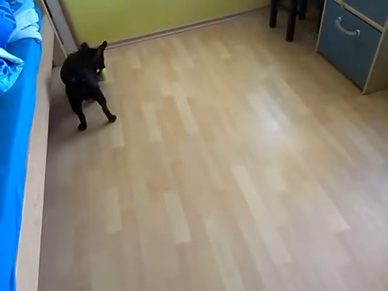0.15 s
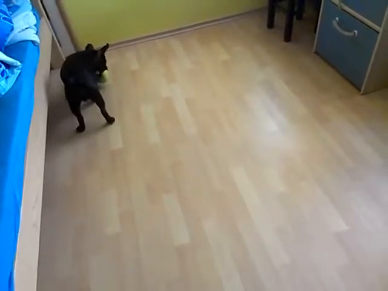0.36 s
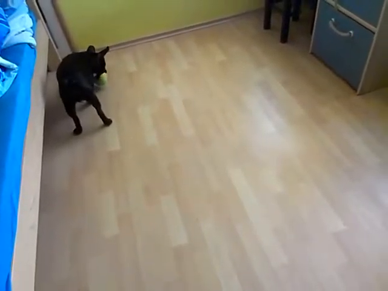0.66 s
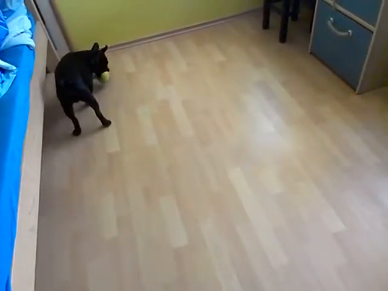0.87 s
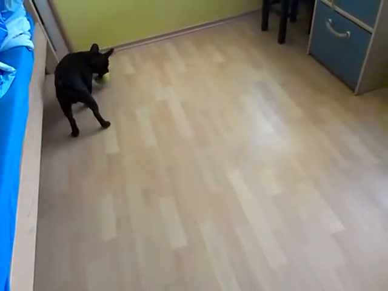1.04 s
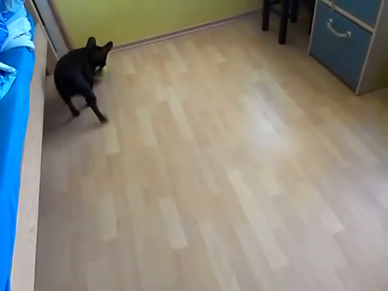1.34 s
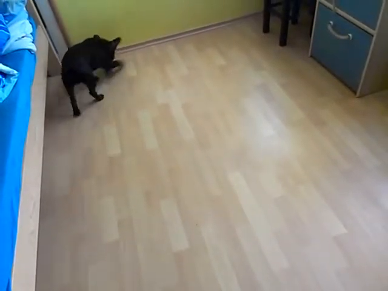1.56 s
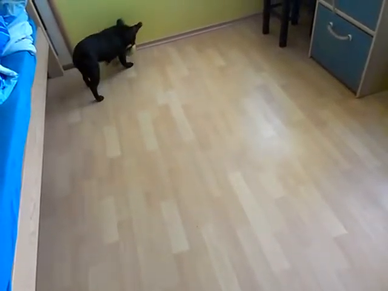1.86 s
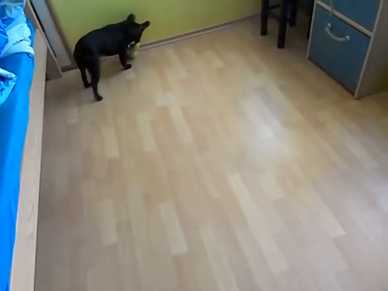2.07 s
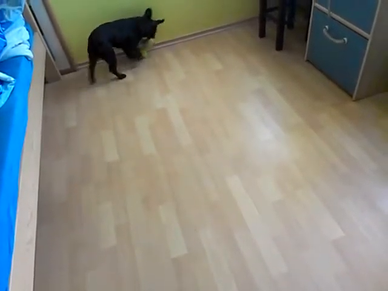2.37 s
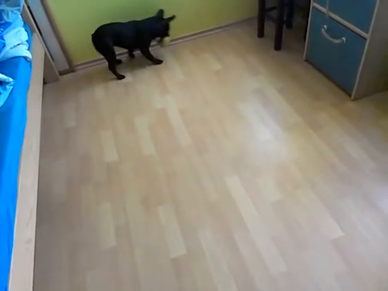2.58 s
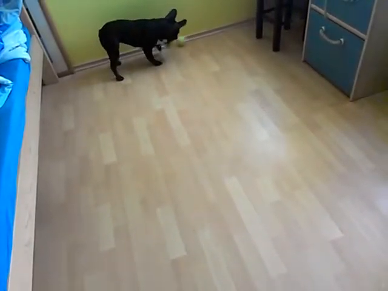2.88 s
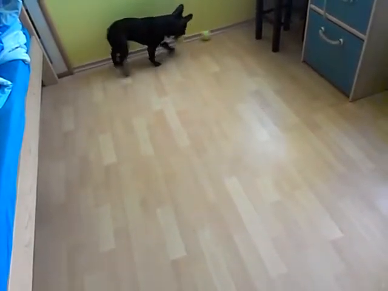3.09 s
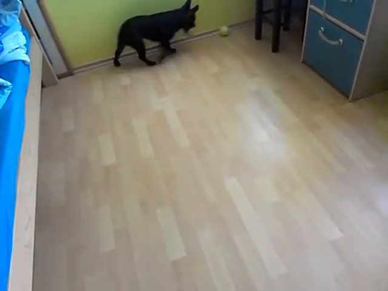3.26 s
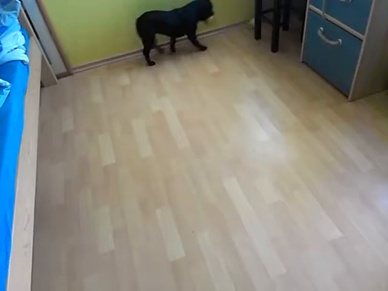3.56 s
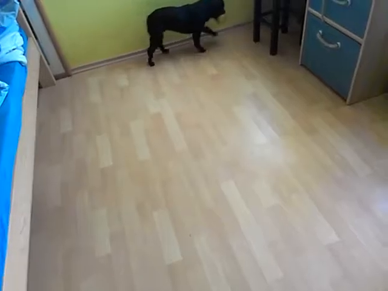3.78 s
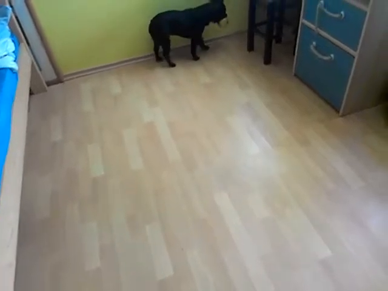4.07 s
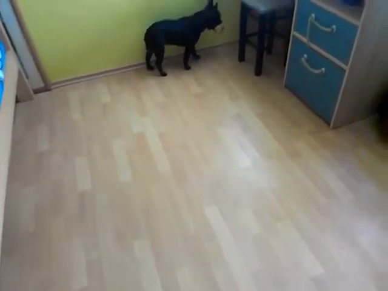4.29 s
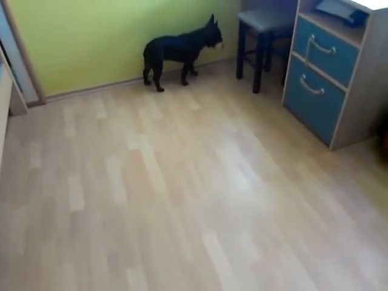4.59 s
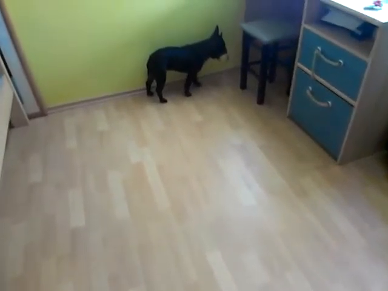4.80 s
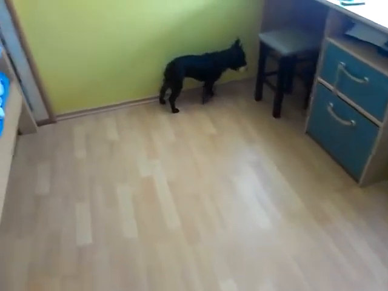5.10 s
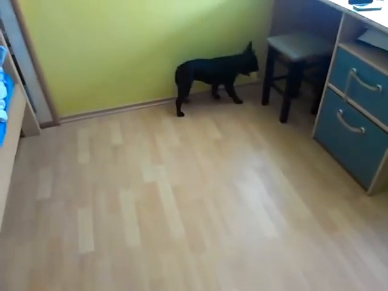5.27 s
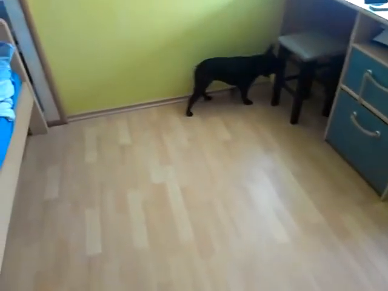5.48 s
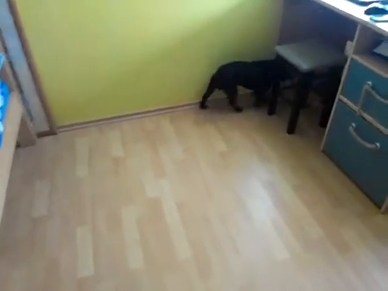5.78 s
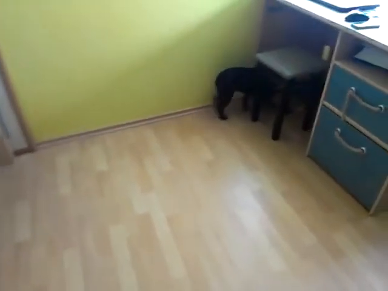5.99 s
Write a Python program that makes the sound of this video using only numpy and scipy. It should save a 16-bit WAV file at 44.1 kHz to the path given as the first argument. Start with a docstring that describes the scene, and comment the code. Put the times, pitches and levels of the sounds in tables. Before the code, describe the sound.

Irregular claw clicks and short hissy skids of a playing dog, with occasional floor knocks in an echoing bedroom.

```python
"""Small dog playing with a ball

A few metres away in a bedroom, a dog's claws tick on the laminate floor and skid in hissy bursts
as they stick and slip. Now and then the ball or a paw knocks, and the floor rings.
The bare room echoes every sound. A low rustle follows the play, over a faint steady hiss."""
import sys
import numpy as np
from scipy import signal
from scipy.fft import rfft, irfft
from scipy.io import wavfile

SR = 44100
rng = np.random.default_rng(int(sys.argv[2]) if len(sys.argv) > 2 else 0)


def dump_mix(stems):
    """Bounce the given channels to the path in sys.argv[1] as a 16-bit WAV at rate SR."""
    frames = np.atleast_2d(stems).T  # one column per channel
    limited = np.clip(frames, -1, 1)  # hard clip at full scale
    pcm = np.round(limited * 32767).astype(np.int16)
    wavfile.write(sys.argv[1], SR, pcm)


N = 271038

# The tone of the steady hiss and of the rustle. Each row: frequency in Hz, relative level in dB.
HISS_TONE = [(15, -1), (25, -5.5), (74, -6.5), (125, -17.5), (183, -8), (307, -13), (382, -12.5),
             (592, -14.5), (2650, -16.5), (8570, -21.5), (11000, -22), (14800, -22.5), (17000, -49)]
RUSTLE_TONE = [(30, -7.5), (100, -4), (200, -2.5), (400, -4.5), (600, -2.5), (1200, -9), (3000, -20.5),
               (10000, -19.5)]
# How long the room rings. Each row: frequency in Hz, seconds to fade by 60 dB.
ROOM_FADE = [(150, 0.36), (500, 0.3), (1500, 0.43), (4000, 0.47), (6500, 0.35), (10000, 0.33),
             (16000, 0.18)]
# The notes of a struck floor. Each row: pitch in Hz, relative level in dB, seconds to fade by 60 dB.
FLOOR_NOTES = [(190, -5.5, 0.058), (245, -16, 0.099), (318, 5.5, 0.015), (569, -6, 0.08), (670, 4.5, 0.016),
               (930, 2, 0.011), (1220, 2.5, 0.021), (1720, 12.5, 0.0033), (3060, 19, 0.0012)]
# The ball or a paw hits the floor. Each row: start in seconds, relative level in dB,
# top of its frequency range in Hz (higher for a harder blow).
KNOCKS = [(1.407, -49, 718), (1.570, -54, 2480), (1.681, -60, 457), (2.024, -36, 4610), (2.574, -60, 476),
          (3.659, -62.5, 393), (4.182, -50.5, 624), (4.468, -51, 654), (4.771, -48, 12950)]
# The tone of a claw, a floorboard and the fizz of a claw's tip.
# Each row: frequency in Hz, relative level in dB.
CLAW_TONE = [(300, -45), (1500, -24), (3000, -16), (4200, -10.5), (5200, -3), (6100, 0.5), (7100, -1.5),
             (8000, -5.5), (9200, -13.5), (10200, -22), (13000, -50), (17000, -81)]
BOARD_TONE = [(80, -17), (250, -40), (500, -5.5), (900, -4), (1700, -4), (2700, -2), (4500, 2), (9000, -15),
              (16000, -50)]
FIZZ_TONE = [(2000, -73), (4000, 1.5), (7000, 0.5), (9200, 7.5), (10400, 4), (11500, 1.5), (13800, -6),
             (15500, -28), (17000, -38)]
# A claw lands. Each row: time in seconds, relative level in dB, hardness in dB (more board and fizz).
TICKS = [(1.1632, -30.5, -1), (1.2745, -34.5, -3), (1.3091, -25, -7), (1.4925, -35, 4), (1.5689, -19, 7),
         (1.6741, -23.5, -1), (1.8091, -30.5, 1.5), (2.134, -37, -4), (2.3575, -38, -4), (2.393, -37.5, -8),
         (2.426, -28, -3), (2.7416, -26.5, 8), (3.1217, -41, 6.5), (3.286, -44, 3), (3.2949, -40.5, 4),
         (3.3082, -37.5, 3), (3.4017, -36, 1), (3.5091, -25.5, -6), (3.8566, -43.5, 0),
         (4.7735, -33.5, 6.5), (5.1548, -37.5, -1), (5.2133, -40, 9), (5.5086, -38, -8), (5.5966, -42.5, 8),
         (5.6416, -27.5, 2.5), (5.8206, -31, 3), (5.9358, -37.5, 2), (5.9558, -33.5, -7),
         (6.0528, -39.5, 6), (6.0827, -36, 3)]
# A paw skids (the faint row at 2.084 s is the ball rolling). Each row: strongest moment in seconds, swell in
# seconds, fade in seconds, relative level in dB, board level and fizz level in dB compared with the claw, board
# pitch in Hz.
SKIDS = [(0.016, .2, 0.1, -45.5, -24, -7.5, 2200), (0.464, 0.044, 0.044, -48.5, -18, -11.5, 2150),
         (0.562, 0.051, 0.044, -48, -16, -9.5, 2140), (1.170, 0.0091, 0.06, -51.5, -9.5, -23, 2250),
         (1.317, .026, 0.028, -31.5, -24, -19, 2330), (1.392, 0.024, 0.026, -41, -14, -14, 2250),
         (1.492, 0.014, 0.0068, -29, -31, -19, 2200), (1.590, 0.017, 0.046, -31.5, -20, -14.5, 2140),
         (1.681, 0.016, 0.011, -33, -25, -25, 2100), (2.084, 0.12, .047, -54, -6.5, -12, 1800),
         (2.142, .02, .01, -34.5, -15.5, -22, 1780), (2.288, 0.062, 0.018, -48, -14, -8, 2400),
         (2.393, 0.022, 0.046, -41.5, -13.5, -29, 2880), (2.453, 0.028, 0.011, -25.5, -19.5, -18.5, 2860),
         (2.715, .05, .035, -42, -8.5, -9.5, 1020), (2.749, .03, 0.011, -36.5, -9.5, -20, 1010),
         (3.312, .007, 0.011, -36.5, -14, -38, 1710), (3.418, 0.0078, 0.091, -33.5, -18.5, -21, 1700),
         (3.477, 0.021, 0.016, -23.5, -20, -19.5, 1680), (3.530, 0.024, 0.035, -55, -5, -17, 1650),
         (3.640, 0.02, 0.0095, -44.5, -15, -25, 1500), (3.905, 0.026, 0.07, -35, -14.5, -19.5, 1140),
         (4.359, 0.038, .03, -60.5, -7, -14, 1250), (4.469, 0.022, 0.013, -56.5, 0, -7, 1280),
         (5.162, 0.019, .04, -51.5, -6, -12, 1470), (5.238, 0.017, 0.0057, -36, -13, -20, 1440),
         (5.370, 0.072, 0.088, -58.5, -9, -12, 1800), (5.517, 0.012, 0.01, -52, -1.5, -25, 2150),
         (5.63, 0.015, 0.018, -34, -13.5, -21, 2460), (5.804, 0.0066, 0.0042, -39.5, -17, -10, 2450),
         (5.836, 0.042, 0.0081, -39, -17, -30, 2450), (5.962, 0.0072, .015, -39, -14, -38, 2450),
         (6.101, 0.047, 0.024, -52, -1.5, -23, 2490)]

TREBLE_LIMIT_HZ = 17100


def gain_of(db):
    """Turn decibels into a number to multiply by."""
    return 10 ** (np.asarray(db) / 20)


def unit(x):
    """Scale a sound to a total energy of 1."""
    return x / np.sqrt(np.sum(x ** 2) + 1e-20)


def look_up(table, hz):
    """Read a table between its rows, on a log frequency scale."""
    row_hz, value = np.transpose(table)
    return np.interp(np.log(hz + 1), np.log(row_hz + 1), value)


def add(mix, start_s, sound):
    """Mix a sound in at the given time."""
    part = mix[max(round(start_s * SR), 0):][:len(sound)]
    part += sound[:len(part)]


def noise(tone):
    """Steady noise with the given tone and an average power of 1."""
    gains = gain_of(look_up(tone, np.fft.rfftfreq(N, 1 / SR)))
    shaped = irfft(rfft(rng.standard_normal(N)) * gains, N)
    return shaped / np.sqrt(np.mean(shaped ** 2) + 1e-20)


def ring(tone, size=2048):
    """How something with this tone rings after one sharp tap."""
    log_gain = np.log(gain_of(look_up(tone, abs(np.fft.fftfreq(size, 1 / SR)))))
    spectrum = np.exp(np.conj(signal.hilbert(log_gain)))  # nothing sounds before the tap
    return unit(np.fft.ifft(spectrum).real[:size // 2])


def resonance(x, hz, width_hz):
    """Keep the part of a sound near one pitch."""
    return signal.lfilter(*signal.iirpeak(hz, hz / width_hz, SR), x)


def house_hiss(level_db=-68):
    """The faint steady hiss of a quiet house."""
    return gain_of(level_db) * noise(HISS_TONE)


def rustle(dog, rustle_db=-66.5, scuff_db=-65.5, busy_db=-52.5, smooth_s=0.19):
    """A low rustle and the scuff of dragging claws rise as the dog moves and sink when it rests."""
    window = unit(signal.windows.hann(round(2 * smooth_s * SR))) ** 2
    power = abs(signal.fftconvolve(dog ** 2, window, "same"))
    busy = np.sqrt(power / (power + gain_of(busy_db) ** 2))  # levels off above busy_db
    return busy * (gain_of(rustle_db) * noise(RUSTLE_TONE) + gain_of(scuff_db) * noise(CLAW_TONE))


def room(x, early_db=-6, early_count=8, echoes_per_s=4000):
    """A few echoes off floor, wall and furniture, and a dense tail where each pitch fades at its own pace."""
    echoes = rng.standard_normal(SR) * (rng.random(SR) < echoes_per_s / SR)
    echoes *= np.arange(SR) > .004 * SR  # the tail starts after 4 ms
    hz, t, bands = signal.stft(echoes, SR, nperseg=256)
    tail = signal.istft(bands * gain_of(-60 * t / look_up(ROOM_FADE, hz)[:, None]), SR)[1]
    early = np.zeros(len(tail))
    early[(SR * rng.uniform(.001, .02, early_count)).astype(int)] = rng.standard_normal(early_count)
    return x + signal.fftconvolve(x, unit(tail) + gain_of(early_db) * unit(early))[:N]


def knocks(boost_db=24, rattle_s=0.0053, smack=0.89, soft_low_hz=120, soft_high_hz=549):
    """The ball or a paw smacks down twice, rattles the loose boards and makes the floor ring."""
    out, t = np.zeros(N), np.arange(SR // 4) / SR
    click = t == 0
    floor = unit(sum(gain_of(db - 60 * t / fade_s) * np.sin(2 * np.pi * hz * t)
                     for hz, db, fade_s in FLOOR_NOTES))
    for start_s, db, high_hz in KNOCKS:
        hardness = high_hz / soft_high_hz
        low_hz = soft_low_hz * hardness ** 0.43  # a harder blow sounds thinner
        gap_s = .026 / hardness ** 0.39  # and hits again sooner
        top_hz = np.clip(high_hz, 2 * low_hz, TREBLE_LIMIT_HZ)
        band = signal.butter(2, [low_hz, top_hz], "bandpass", fs=SR, output="sos")
        for delay_s, drop_db in [(0, 0), (gap_s, -3)]:
            rattle = unit(rng.standard_normal(len(t)) * np.exp(-t / rattle_s))
            blow = signal.fftconvolve(click + rattle, floor + smack * click)
            blow = unit(signal.sosfilt(band, blow))
            add(out, start_s + delay_s, gain_of(db + drop_db + boost_db) * blow)
    return out


def claw_on_board(force, board_db, fizz_db, board_hz):
    """A push rings the claw and the board under it; the claw's tip adds a fine fizz."""
    claw_hz = 6380 * 2 ** (0.2 * rng.uniform(-1, 1))  # each paw has its own pitch
    claw, board = ring(CLAW_TONE), ring(BOARD_TONE)
    claw = claw + 0.77 * resonance(claw, claw_hz, width_hz=1100)
    board = board + 0.81 * resonance(board, board_hz, width_hz=650)
    # the three parts sound independently, so their powers add
    parts = [(0, claw), (board_db, board), (fizz_db, ring(FIZZ_TONE))]
    power = sum(abs(rfft(gain_of(db) * unit(body))) ** 2 for db, body in parts)
    tone = np.transpose([np.fft.rfftfreq(len(claw), 1 / SR), 10 * np.log10(power + 1e-12)])
    return unit(signal.fftconvolve(force, ring(tone)))


def toe_touches(softer_db=-15, spread_db=4, scatter_s=0.019):
    """Another toe touches down lightly near each skid; gives rows like those of TICKS."""
    chance = rng.standard_normal((len(SKIDS), 2))
    return [(peak_s + scatter_s * when, db + softer_db + spread_db * weight, 0)
            for (peak_s, _, _, db, *_), (when, weight) in zip(SKIDS, chance)]


def claw_ticks(boost_db=18, chatter_s=0.0027, bounces_per_s=4500, board_db=-17.5, fizz_db=-18.5):
    """A claw brushes the floor, lands with a click, then chatters briefly as the weight comes on."""
    out, t = np.zeros(N), np.arange(-SR // 60, SR // 30) / SR
    click, after = t == 0, np.maximum(t, 0)
    for land_s, db, hard_db in TICKS + toe_touches():
        hiss, chance = rng.standard_normal(len(t)), rng.random(len(t))
        brush = unit(hiss * (t < 0) * np.exp(t / .007))
        chatter = unit(hiss * (chance < bounces_per_s / SR) * after * np.exp(-after / chatter_s))
        force = 0.4 * brush + click + 3.0 * chatter
        board_hz = 2020 * 2 ** (0.45 * rng.uniform(-1, 1))  # each spot of floor has its own pitch
        tick = claw_on_board(force, board_db + hard_db, fizz_db + hard_db, board_hz)
        add(out, land_s + t[0], gain_of(db + boost_db) * tick)
    return out


def claw_skids(catches_per_s=1000, catch_share=0.38, clump_db=3.5, clump_s=.003):
    """Claws stick and slip on the floor's grain, and once the ball rolls faintly: clumps of tiny catches over a
    fine rubbing hiss."""
    out, t = np.zeros(N), np.arange(N) / SR
    grip = gain_of(clump_db * np.interp(t, np.arange(N) * clump_s, rng.standard_normal(N)))
    for peak_s, swell_s, fade_s, db, board_db, fizz_db, board_hz in SKIDS:
        span = (t > peak_s - 2 * swell_s) & (t < peak_s + 2 * fade_s)
        near = t[span]
        pressure = np.exp(-2 * ((near - peak_s) / np.where(near < peak_s, swell_s, fade_s)) ** 2)
        chance, hiss = rng.random(SR)[:len(near)], rng.standard_normal(SR)[:len(near)]
        catches = unit((chance < catches_per_s / SR) * np.sign(hiss) * pressure)
        rubbing = unit(hiss * pressure)
        force = grip[span] * (np.sqrt(catch_share) * catches + np.sqrt(1 - catch_share) * rubbing)
        skid = claw_on_board(force, board_db, fizz_db, board_hz)
        add(out, near[0], gain_of(db) * np.linalg.norm(pressure) * skid)
    return out


def scene(dog_db=-1.5):
    """The dog in the room, the rustle that follows it, and the hiss of the house."""
    dog = gain_of(dog_db) * room(claw_skids() + claw_ticks() + knocks())
    return (dog + rustle(dog) + house_hiss())[None]


def record(dry):
    """Cut away the very highest treble."""
    low_pass = signal.firwin(511, TREBLE_LIMIT_HZ, window=("kaiser", 9), fs=SR)
    return signal.oaconvolve(dry, low_pass[None], "same")


dry = scene()
out = record(dry)
dump_mix(out)
```